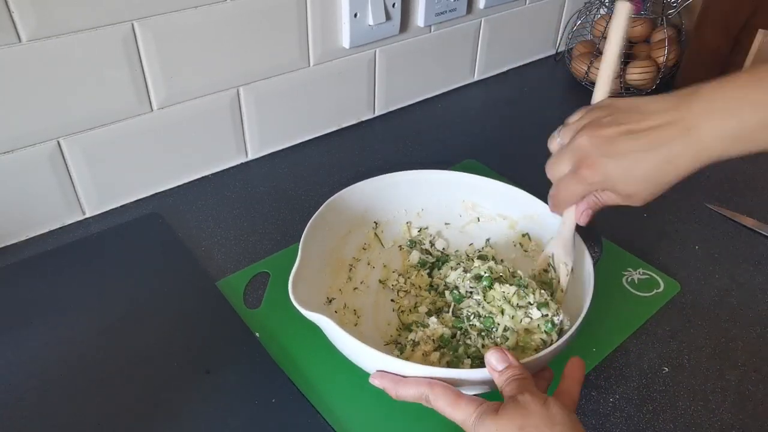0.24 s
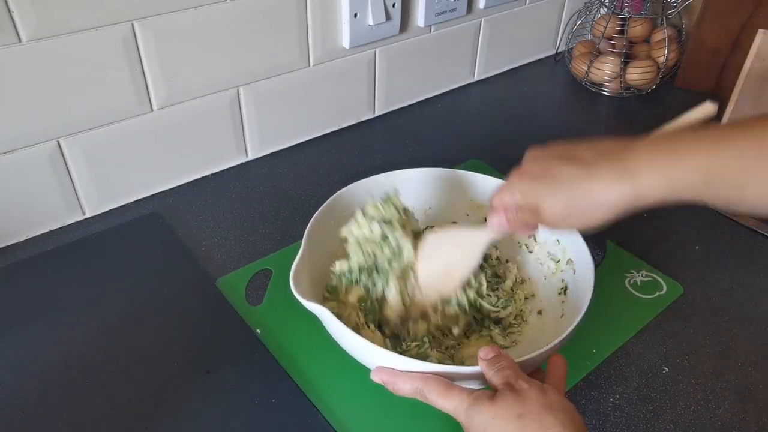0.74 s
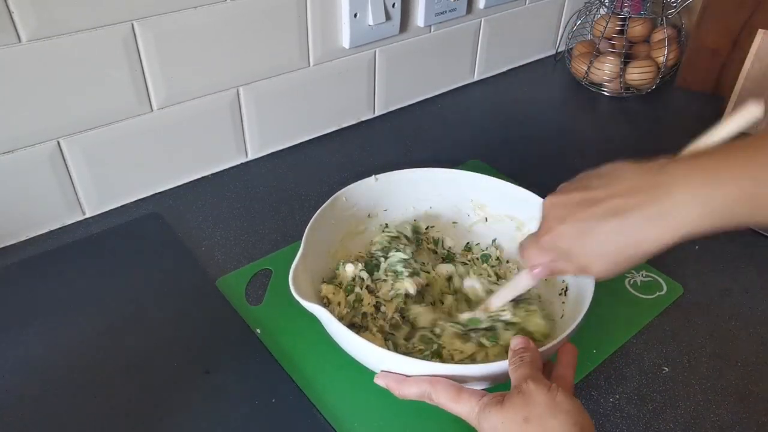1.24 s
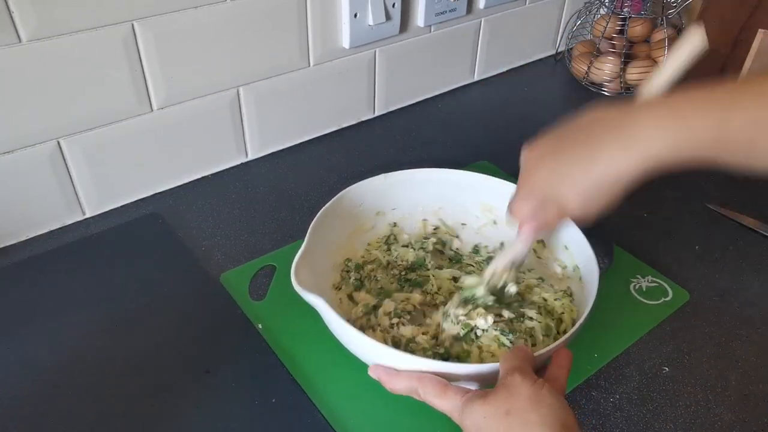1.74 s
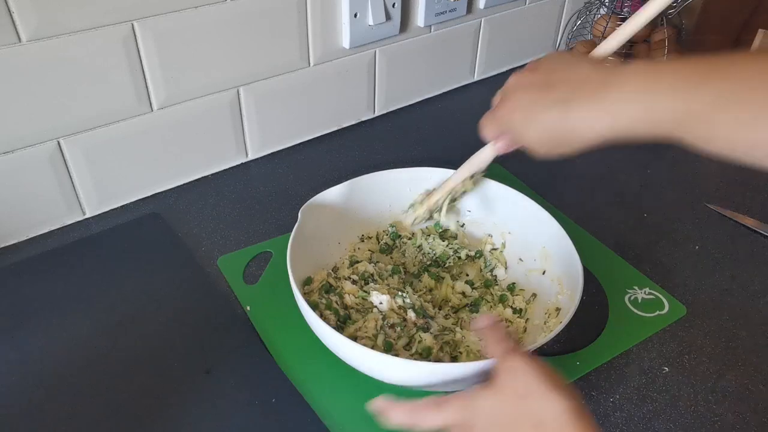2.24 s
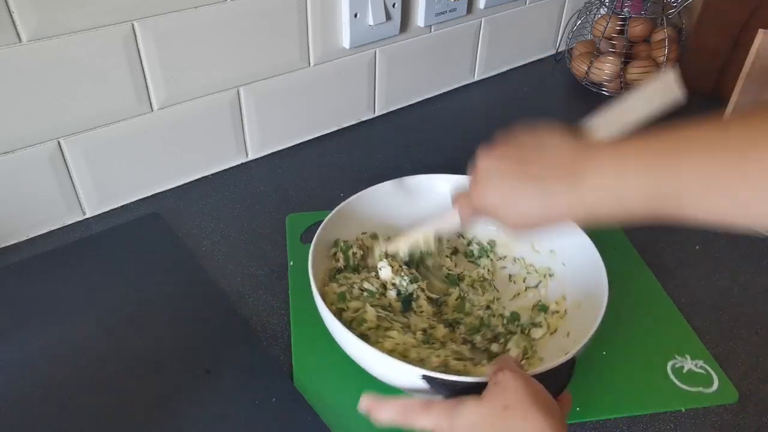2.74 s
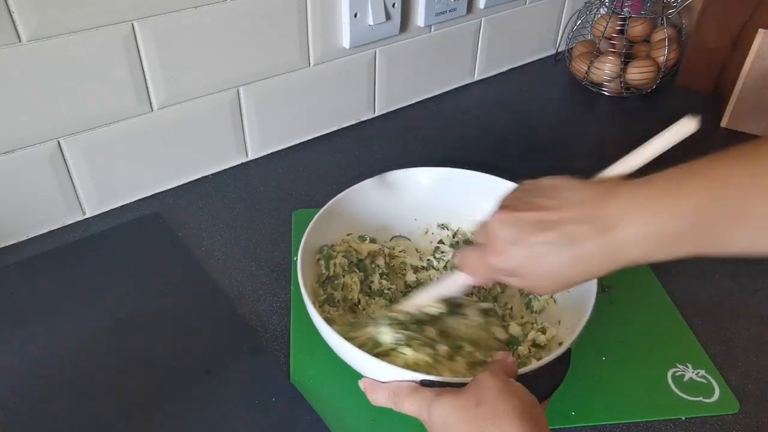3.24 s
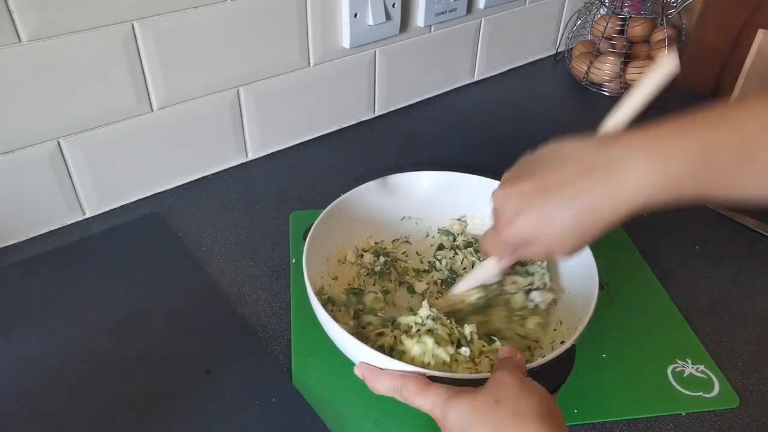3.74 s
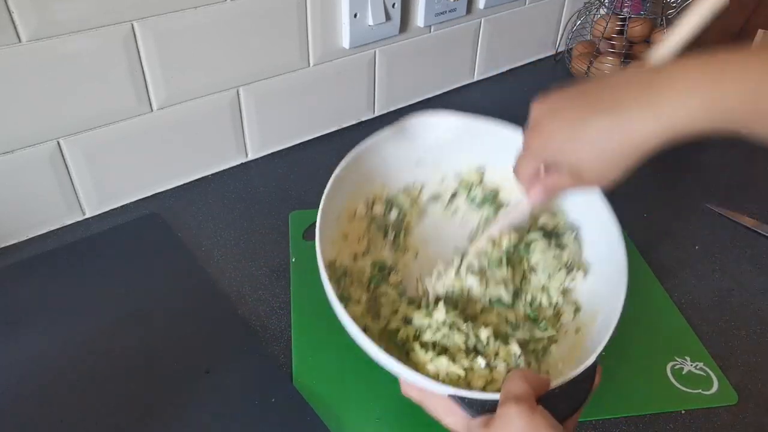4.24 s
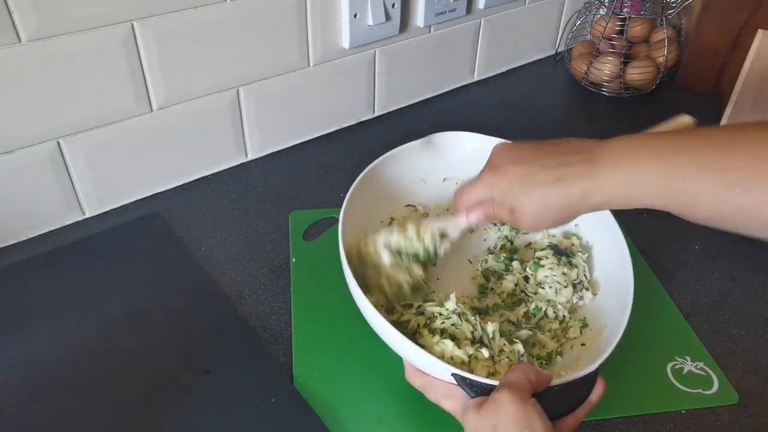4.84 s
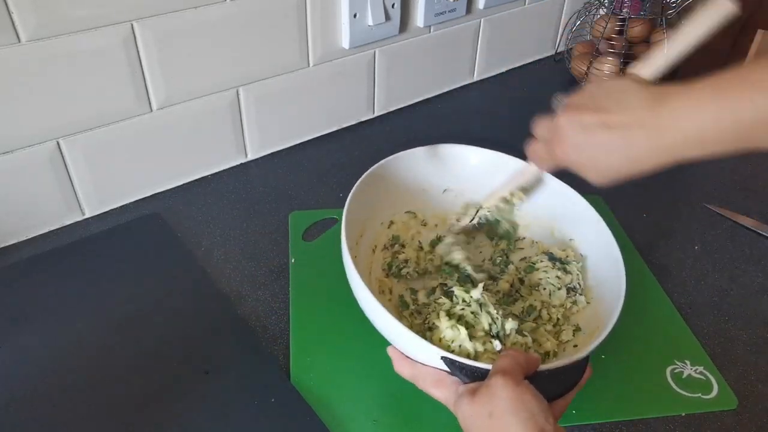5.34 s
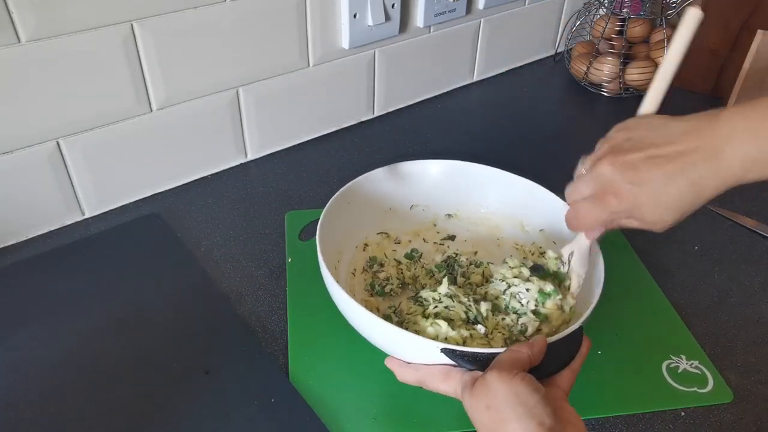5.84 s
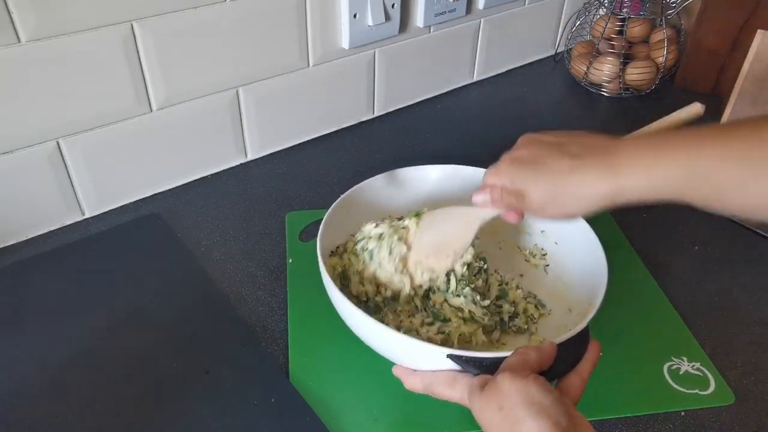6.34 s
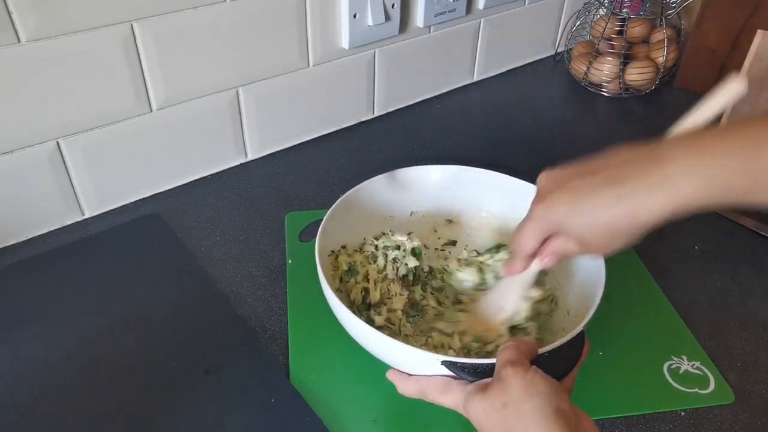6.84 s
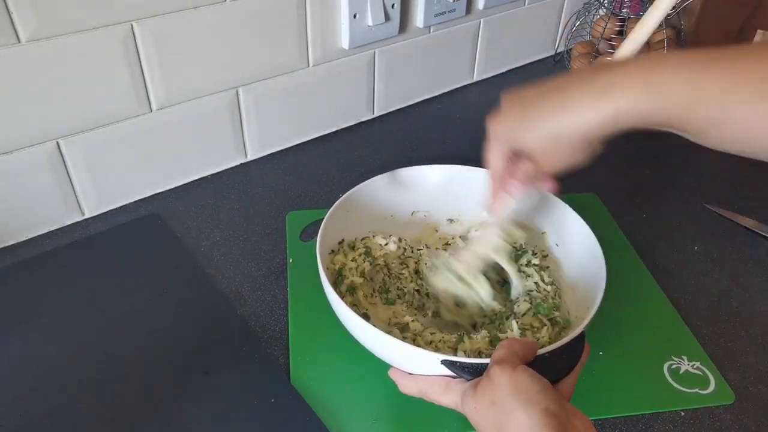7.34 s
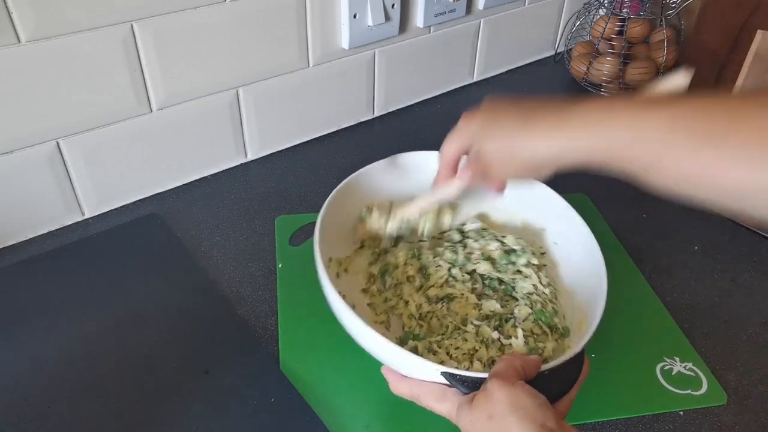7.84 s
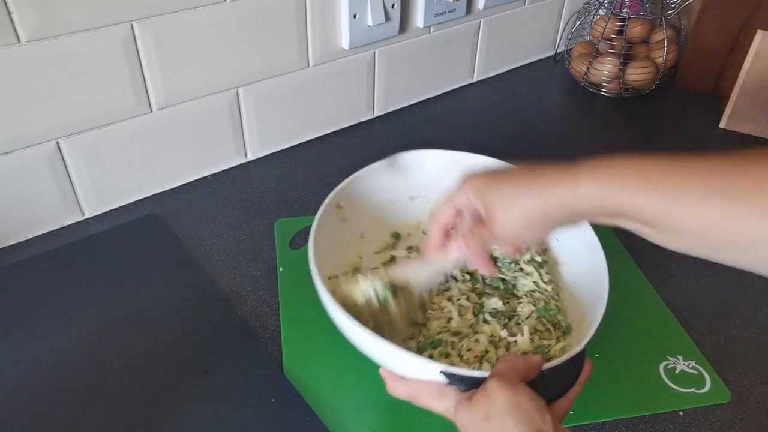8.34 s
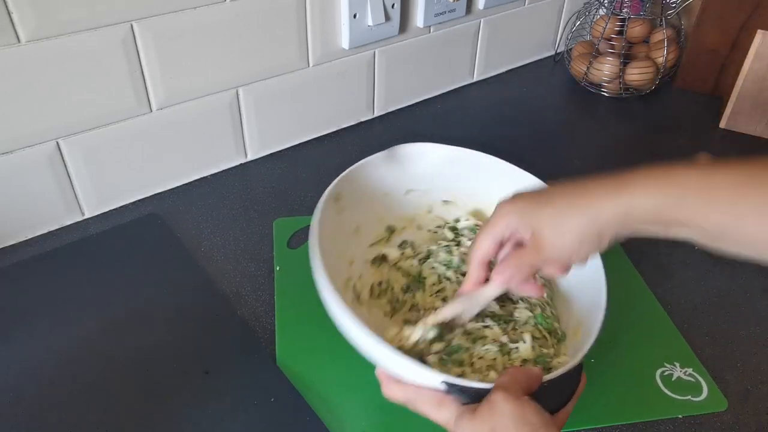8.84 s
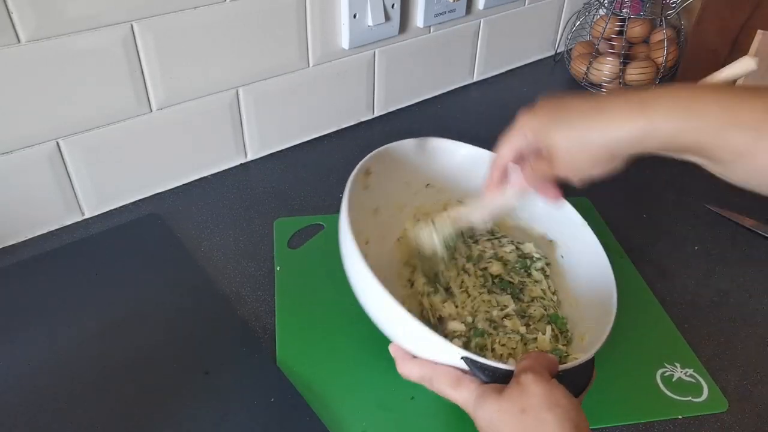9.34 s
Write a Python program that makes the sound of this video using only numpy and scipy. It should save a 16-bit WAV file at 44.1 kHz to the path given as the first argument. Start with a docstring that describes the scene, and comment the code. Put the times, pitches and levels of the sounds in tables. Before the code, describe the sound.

A wooden spoon works thick, wet shredded batter in a plastic bowl, heard closely in stereo and slightly right of centre. From 0 to 2 seconds, soft strokes swell and fade: fine sticky crackling, scraping and a hollow drag, with barely audible knocks. At 2.15 a short woody squeak meets a firm double knock; a moist pop follows near 2.4 and another at 2.9. Hollow knocks land around 3.4, 3.7, 4.1 and 4.6. Near 4.8 there is a wet smack, then a low bump as the bowl settles around 4.9. A knock at 5.4 leads into the strongest squelch at 5.6. Between 6 and 8 the stirring is mainly wet, with pops and lighter taps. Sharper knocks come at 8.3 and 8.8, the loudest at 9.1, then a softer one at 9.5. Short kitchen echoes and faint low hum remain throughout.

```python
"""A wooden spoon folds thick grated-vegetable batter in a hand-held plastic bowl on a kitchen worktop.
Each push tears tiny wet films (showers of clicks) and rubs the bowl (slips filtered into scrape and drag).
Damp wood squeaks in pitched noise, knocks flex the wall as damped swings, wet pockets pop as noise bursts,
and the bowl bumps on its board in fading low tones.
Bowl and room add short echoes, over a low appliance hum and faint room noise."""
import sys
import numpy as np
from scipy import signal
from scipy.fft import rfft, irfft
from scipy.io import wavfile
from scipy.ndimage import uniform_filter1d

SR = 44100
rng = np.random.default_rng(int(sys.argv[2]) if len(sys.argv) > 2 else 0)


def transcribe(u):
    """Save the signal u as a 16-bit wav file named by the first command-line argument.

    u: samples, shape (n,) or (channels, n), limited to [-1, 1]; the rate is SR.
    q: integer samples, one column per channel.
    """
    v = np.clip(np.atleast_2d(u).T, -1, 1)
    q = np.round(v * 32767).astype(np.int16)
    wavfile.write(sys.argv[1], SR, q)


N = 422478  # length in samples

# Pushes of the spoon through batter: start t/s, attack t/s, hold t/s, release t60/s,
# squelch level/dB before a fixed boost, scrape and drag level/dB compared with that squelch level
PUSHES = [(-.08, 0.13, 0.045, 0.75, -53.5, -1, -3), (0.339, 0.24, 0.017, 0.67, -59.5, 1.5, 2),
          (.64, 0.04, 0.23, 1.1, -62, -5, -10), (1.101, 0.18, 0.037, 0.48, -55, -3.5, -8.5),
          (1.353, 0.044, 0.0086, 0.11, -53, -10, -25), (1.583, 0.093, 0.18, 0.3, -53.5, -8, -12),
          (1.93, 0.11, 0.077, .3, -70, 4.5, 7.5), (2.081, 0.054, 0.0089, 0.43, -50.5, -0.5, 6),
          (2.383, 0.029, 0.19, .4, -51.5, -6.5, -9.5), (2.437, 0.1, 0.099, 0.94, -51.5, 0.5, 3),
          (2.79, .02, 0.072, 0.64, -56, -3, -2.5), (2.864, 0.013, 0.071, 0.68, -50.5, -7, -7),
          (3.193, 0.18, .06, 0.51, -50, -5.5, -11), (3.637, 0.086, 0.093, 0.5, -52.5, -4.5, -2.5),
          (4.097, 0.016, 0.025, 0.92, -53.5, -4, -2), (4.665, 0.083, 0.18, 1.33, -55.5, -4.5, -3.5),
          (5.05, 0.057, 0.086, 0.16, -57, -8, -11.5), (5.359, 0.081, 0.16, 0.27, -54, -10, -9),
          (5.516, 0.12, 0.016, 0.54, -46.5, 1, 0), (5.887, 0.058, 0.17, 0.46, -65, -5, -7),
          (6.046, 0.12, 0.046, 0.63, -54.5, -.5, -5.5), (6.294, 0.021, 0.17, 0.75, -64, -14, -23),
          (6.726, 0.11, 0.14, 0.58, -50.5, -5, -13.5), (7.132, 0.082, 0.15, 0.28, -51, -6.5, -12.5),
          (7.539, 0.078, 0.11, 0.34, -51, -4, -7), (7.908, 0.094, 0.016, 0.61, -50, -3, 0.5),
          (8.122, 0.0081, 0.035, 0.18, -53, -4, -25), (8.309, 0.01, 0.16, 0.53, -56.5, -4, -0.5),
          (8.553, .06, .015, 0.093, -61.5, -3, -3), (8.758, 0.062, 0.042, 0.54, -55, -3, -0.5),
          (9.14, 0.022, 0.12, 0.54, -58.5, -2, -6), (9.302, 0.059, 0.008, 0.12, -53, -7.5, -17),
          (9.495, 0.018, 0.056, .5, -59, -5, -2)]
# Share of fine high fizz in the squelch: t/s, level/dB above 8 kHz
FIZZ_SHARE = [(1.7, -1), (2.2, -7.5), (2.5, -5), (3.3, -0.5), (4.3, -1), (5.1, 3), (5.7, -3.5), (7.3, 0),
              (8.8, 3.5), (9.5, 1)]
# Spectrum shape of wet films: f/Hz, relative level/dB
WET_SPECTRUM = [(1470, -18.5), (2500, -9), (3740, -6.5), (5870, -1.5), (6760, -2.5), (8020, -12.5),
                (9960, -8), (10800, -5.5), (11800, -8.5), (13000, -3.5), (14100, -11.5), (15200, -6),
                (16000, -25)]
# Spectrum shape of scraping on the wall: f/Hz, relative level/dB
SCRAPE_SPECTRUM = [(300, -19.5), (800, -19), (1300, -1), (1700, 2), (2300, 1.5), (2900, -2), (4000, -13.5),
                   (8000, -29)]
# Spectrum shape of the hollow drag: f/Hz, relative level/dB
DRAG_SPECTRUM = [(80, -0.5), (200, -9), (350, -3.5), (600, 4), (800, -1.5), (1100, -2.5), (1500, -15.5),
                 (3000, -53)]
# Left minus right for the batter: f/Hz, level/dB
BATTER_LEAN = [(100, 1.5), (500, -9), (1200, -3.5), (2500, -3.5), (5000, -5), (7000, 0.5), (9000, -4),
               (11500, -15.5), (16000, -40)]
# Appliance hum: f/Hz, level/dB (rms, before wavering)
HUM_TONES = [(47.2, -82.5), (49.8, -58), (98.8, -65)]
# Spectrum shape of the room noise: f/Hz, relative level/dB
ROOM_SPECTRUM = [(20, -22.5), (32, -5.5), (46, -2), (60, -2), (78, -34), (105, -13.5), (160, -23.5),
                 (300, -23.5), (800, -32.5), (2000, -39.5), (3500, -41.5), (5500, -38.5), (8500, -50),
                 (16000, -51)]
# Filter for the left-right difference of the room noise: f/Hz, level/dB
ROOM_WIDTH = [(150, -11.5), (600, -1.5), (2000, -0.5)]
# Damp wood squeaking on the wall: middle t/s, length t/s, pitch f/Hz, relative level/dB
WOOD_SQUEAKS = [(0.05, 0.12, 694, -66), (0.064, 0.071, 2170, -68.5), (0.486, 0.24, 2210, -64.5),
                (0.926, 0.064, 1030, -67.5), (1.076, 0.19, 2980, -70), (1.092, 0.093, 860, -67),
                (2.15, 0.032, 2150, -49.5), (4.865, 0.059, 1790, -55.5), (6.2, 0.23, 780, -62.5),
                (6.875, .06, 960, -61)]
# Spoon against bowl: t/s, knock level/dB, knock f/Hz, overtone relative level/dB,
# crack f/Hz, crack relative level/dB, board thud relative level/dB (overtone and thud get fixed boosts)
SPOON_KNOCKS = [(0.220, -47.5, 300, -2, 1500, -1.5, 8), (0.838, -55.5, 420, -44, 1850, -36, -20),
                (2.024, -51, 218, -17, 2000, -27, 15), (2.154, -27, 370, -1.5, 1610, -4.5, -0.5),
                (2.161, -21, 252, -19, 1080, -18, -9), (3.182, -60.5, 398, 10.5, 1700, -19, -20),
                (3.378, -23.5, 311, -10, 1680, -19, -6), (3.680, -30, 277, -36, 1788, -23, -6.5),
                (3.751, -38, 458, -23, 1700, 4, -4.5), (4.116, -22, 306, -5, 1710, -15, -10),
                (4.634, -18, 456, -6.5, 1970, -7.5, -44), (4.756, -41, 428, -3, 2000, -25, -26),
                (4.806, -51, 477, 9, 1200, -14, -24), (5.341, -55.5, 430, 2, 1840, 4, -20),
                (5.387, -20.5, 356, -1.5, 2640, -7.5, -29), (5.724, -32.5, 332, -19, 1940, 0, 3),
                (5.880, -53, 308, -24, 1900, -9.5, -3), (6.472, -46.5, 277, -17, 1920, -3, 0),
                (7.13, -38, 318, -10, 1600, -23, -3), (7.896, -46.5, 410, -8, 1900, -8, -16),
                (7.920, -44.5, 324, -14, 1700, -14, -4), (7.996, -38, 312, -22, 1750, -10, -18),
                (8.013, -40, 380, 8, 1220, 7, 2), (8.324, -24.5, 490, 1, 1700, 8.5, -16),
                (8.331, -35, 490, 11, 2130, 6, -25), (8.756, -19.5, 323, -7, 2690, -8.5, -22.5),
                (9.139, -11.5, 421, -6.5, 2700, -15.5, -39), (9.503, -26.5, 286, -51, 2030, -21.5, -13.5)]
# Ringing tones of the bowl wall, damped by batter and hand: f/Hz, relative level/dB, t60/s
BOWL_MODES = [(319, -5, 0.23), (396, -10, 0.235), (483, 4, 0.063), (592, -7, 0.091), (707, -3, 0.17),
              (801, 13, 0.078), (934, -10, 0.066), (940, -10, .18), (1230, -15, 0.12), (1200, 14, 0.039),
              (1520, -10, .1), (1672, -5, .12), (1810, 9, 0.082), (2120, 1, .1), (2335, 13.5, .07),
              (2860, -11, .07)]
# Spectrum shape of the contact tick: f/Hz, relative level/dB
TICK_SPECTRUM = [(300, 1), (1000, 10.5), (1800, 2), (2700, 1), (3600, -9), (6500, -7), (8500, -22.5),
                 (13000, -15), (16000, -19)]
# Wet pockets popping: t/s, relative level/dB, extra level/dB above 8 kHz
WET_SMACKS = [(0.836, -53.5, 25), (1.746, -38, 2), (2.404, -38, 13), (2.434, -13.5, -18),
              (2.801, -38.5, 15), (2.88, -18.5, -16), (3.035, -38.5, 20), (3.663, -33, 3),
              (3.7494, -35, 13), (3.94, -46, 23), (4.253, -28.5, 4.5), (4.403, -39.5, 13.5),
              (4.777, -19, 5), (4.909, -36, 19), (6.136, -16.5, -1), (6.8668, -24, 0), (7.931, -20.5, 9),
              (8.155, -28.5, 12), (8.756, -26.5, 14.5), (9.504, -33.5, 16.5)]
# Bowl settling on the board: t/s, level/dB, pitch f/Hz
BOWL_BUMPS = [(2.171, -40, 65), (4.859, -33, 149), (4.866, -33.5, 120.6), (4.875, -30, 52),
              (4.968, -42, 52), (7.561, -47.5, 187)]
# How long the kitchen rings: f/Hz, t60/s
KITCHEN_DECAY = [(80, 0.46), (300, 0.22), (800, 0.3), (2500, 0.32), (7000, 0.23), (15000, 0.14)]
# Left minus right for the bowl: f/Hz, level/dB
BOWL_LEAN = [(120, 0.5), (280, -2), (550, -4.5), (1100, -5), (2500, -5.0), (6000, -10.5), (12000, -41.0)]

TOP_HZ = 16100  # upper edge of the final sound
SAG_DB_PER_S = 4.5  # the batter gives way while the push is held
WALL_POWER = 1.34  # rubbing on the wall follows the push to this power
BUMP_CYCLES = 13.2  # swings until a bump's decay reaches -60 dB
OVERTONE_RATIO = 1.89  # second flexing of the wall, as a multiple of the knock pitch


def undb(db):
    """Turn decibels into gain."""
    return 10 ** (np.asarray(db) / 20)


def unit(x):
    """Scale to rms 1."""
    return x / np.sqrt(np.mean(x ** 2))


def at(points, hz):
    """Read (Hz, value) points on a log-frequency axis."""
    f, value = np.transpose(points)
    return np.interp(np.log(np.maximum(hz, 1)), np.log(f), value)


def colour(x, points):
    """Filter by (Hz, dB) points without sounding early; the cepstrum gives the minimum-phase response."""
    size = 4096
    gain = undb(at(points, np.linspace(0, SR / 2, size // 2 + 1)))
    cepstrum = irfft(np.log(gain))
    # fold the second half onto the first
    cepstrum[1:size // 2] *= 2
    cepstrum[size // 2 + 1:] = 0
    response = irfft(np.exp(rfft(cepstrum)))
    return signal.fftconvolve(x, response)[:len(x)]


def sine(hz, t):
    """A pure tone of peak 1."""
    return np.sin(2 * np.pi * hz * t)


def split_filter(kind):
    """Filter that keeps the sound below ("low") or above ("high") 8 kHz."""
    return signal.butter(3, 8000, kind, fs=SR, output="sos")


def add(track, s, x):
    """Mix x into track at time s, or at the very start if s is negative."""
    i = max(int(s * SR), 0)
    n = min(len(x), len(track) - i)
    track[i:i + n] += x[:n]


def walk(rate):
    """Random levels, rate of them per second, joined by straight glides; rms 1."""
    k = max(int(SR / rate), 1)
    steps = np.repeat(rng.standard_normal(N // k + 1), k)[:N]
    return unit(uniform_filter1d(steps, k))


def fade(t, t60):
    """Exponential decay, 60 dB down at t60."""
    return undb(-60 * t / t60)


def curves(table):
    """Columns of a (s, ..) table, joined by straight lines."""
    s, *columns = np.transpose(table)
    return [np.interp(np.arange(N) / SR, s, c) for c in columns]


def grains(per_s, spread_db):
    """Randomly timed clicks, more uneven in size as spread_db grows; rms 1."""
    sizes = undb(spread_db * np.minimum(rng.exponential(size=N), 5))
    happens = rng.random(N) < per_s / SR
    return unit(happens * sizes * rng.choice([-1, 1], N))


def scatter(clicks, near_db, far_db):
    """Clicks from many spots leave noise-like echoes: quick ones in the bowl, slow ones in the room."""
    t = np.arange(SR // 3) / SR
    near, far = fade(t, 0.014) ** 2, fade(t, 0.19) ** 2
    echo = undb(near_db) ** 2 * near / near.sum() + undb(far_db) ** 2 * far / far.sum()
    energy = np.maximum(signal.fftconvolve(clicks ** 2, echo)[:N], 0)
    echoes = np.sqrt(energy) * rng.standard_normal((2, N))
    return (clicks + echoes) / np.sqrt(1 + echo.sum())


def voiced(x, points):
    """Give a white stereo pair a spectrum while keeping its power about the same."""
    gain = np.sqrt(np.mean(undb(at(points, np.linspace(0, SR / 2, 2048))) ** 2))
    return np.array([colour(side, points) for side in x]) / gain


def brighten(x, db):
    """Change the level above 8 kHz, where the thinnest films sound."""
    top = signal.sosfiltfilt(split_filter("high"), x)
    return x + (undb(db) - 1) * top


def pockets(x, depth_db):
    """Hollows between spoon, batter and wall open and close, so narrow resonances come and go."""
    _, _, spectra = signal.stft(x, nperseg=1024)
    field = rng.standard_normal(spectra.shape[1:])
    # smooth the random gains over pitch, then over time
    for _ in range(2):
        field = uniform_filter1d(field, size=4, axis=0)
        field = uniform_filter1d(field, size=2, axis=1)
    gain = unit(undb(depth_db * unit(field)))
    return signal.istft(spectra * gain, nperseg=1024)[1][:, :N]


def pushes():
    """Each push builds, holds as the batter yields, then dies away; gives gains of squelch, scrape and drag."""
    power = np.zeros((3, N))
    for s, attack, hold, t60, db, scrape_db, drag_db in PUSHES:
        t = np.maximum(np.arange(N) / SR - s, 0)
        push = np.minimum(t / attack, 1)
        push = push * undb(-SAG_DB_PER_S * np.clip(t - attack, 0, hold))
        push *= fade(np.clip(t - attack - hold, 0, 2 * t60), t60)
        wall = push ** WALL_POWER
        gains = np.array([push, undb(scrape_db) * wall, undb(drag_db) * wall])
        power += (undb(db) * gains) ** 2
    return np.sqrt(power)


def squelch(strength, fizz_db):
    """Wet films tear between the shreds: a fine, uneven fizz with coarser crackles on top."""
    fizz = grains(per_s=6300, spread_db=0.0) * undb(1.84 * walk(70))
    crackle = grains(per_s=200, spread_db=4.0)
    tears = unit(fizz + undb(-3.5) * crackle) * undb(4) * strength
    wet = voiced(scatter(tears, near_db=7.0, far_db=8.5), WET_SPECTRUM)
    return pockets(brighten(wet, fizz_db), depth_db=2.5)


def rubbing(scraping, dragging):
    """Shreds slip over the wall in small jerks, heard as a scrape and a hollow drag of the whole bowl."""
    slips = unit(grains(per_s=1200, spread_db=2.5) * undb(2.1 * walk(45)))
    scrape = scatter(slips * undb(1) * scraping, near_db=-7.0, far_db=2.5)
    drag = scatter(slips * dragging, near_db=-9.0, far_db=-0.5)
    both = voiced(scrape, SCRAPE_SPECTRUM) + voiced(drag, DRAG_SPECTRUM)
    return pockets(both, depth_db=1.5)


def background():
    """A wavering appliance hum of pure tones and faint room noise, its bass mostly shared by both sides."""
    t = np.arange(N) / SR
    hum = np.zeros(N)
    for hz, db in HUM_TONES:
        level = undb(db + 0.5 * walk(2.6)) * np.sqrt(2)  # root 2 turns rms into peak
        hum += level * np.sin(2 * np.pi * hz * t + 0.08 * walk(16))
    mid, side = (unit(colour(rng.standard_normal(N), ROOM_SPECTRUM)) for _ in range(2))
    side = colour(side, ROOM_WIDTH)
    return hum + undb(-61) * (mid + side * np.array([[1], [-1]]))


def squeaks():
    """Wood that quickly sticks and slips gives short, rough, pitched rubs: noise through a ringing tone."""
    out, t = np.zeros(N), np.arange(SR // 20) / SR
    for s, length, hz, db in WOOD_SQUEAKS:
        n = int(length * SR)
        ring = sine(hz, t) * fade(t, 0.007)
        rub = signal.fftconvolve(rng.standard_normal(SR // 2), ring)[:n]
        add(out, s - length / 2, undb(db) * unit(rub) * np.hanning(n))
    return out


def flex(cycles):
    """The damped wall gives way and springs back for a cycle or two; peak 1."""
    swing = -np.sin(2 * np.pi * cycles) * cycles ** 1.78 * np.exp(-cycles / 0.32)
    return swing / np.abs(swing).max()


def knocks():
    """Each blow flexes the wall, rings its modes and thuds through the board; bare wood adds a crack."""
    out, t = np.zeros(N), np.arange(SR // 3) / SR
    modes = sum(undb(db) * sine(hz, t) * fade(t, t60) for hz, db, t60 in BOWL_MODES)
    thud = sine(117, t) * fade(t, 0.058) * (1 - fade(t, 0.017))
    for s, db, hz, overtone_db, crack_hz, crack_db, thud_db in SPOON_KNOCKS:
        bend = flex(hz * t)
        overtone = sine(OVERTONE_RATIO * hz, t) * fade(t, 0.012) * (1 - fade(t, 0.0049)) ** 2
        burst = rng.standard_normal(len(t)) * fade(t, 0.019) * (1 - fade(t, 0.027))
        tick = colour(burst, TICK_SPECTRUM)
        wood = sine(crack_hz, t) * fade(t, 0.006) * (1 - fade(t, 0.004))
        crack = undb(1) * tick / np.abs(tick).max() + undb(7.5) * wood
        blow = bend + undb(overtone_db + 10.5) * overtone + undb(crack_db) * crack
        ring = undb(-57.5) * signal.fftconvolve(blow, modes)[:len(t)]
        add(out, s, undb(db) * (blow + ring + undb(thud_db + 5.0) * thud))
        # a bowl pressed onto the board chatters twice as it rocks
        chatter = undb(db + min(thud_db - 7, -5)) * bend
        add(out, s + 0.00871, chatter)
        add(out, s + 0.01833, undb(1.5) * chatter)
    return out


def smacks():
    """Air pockets burst as the batter peels off the spoon: very short noise bursts, each with its own fizz."""
    low, high, t = np.zeros(N), np.zeros(N), np.arange(SR // 20) / SR
    for s, db, fizz_db in WET_SMACKS:
        burst = rng.standard_normal(len(t)) * fade(t, 0.0097) * undb(db - 12.0)
        add(low, s, burst)
        add(high, s, burst * undb(fizz_db))
    low, high = (voiced(scatter(x, near_db=0, far_db=2.5), WET_SPECTRUM) for x in (low, high))
    return signal.sosfilt(split_filter("low"), low) + signal.sosfilt(split_filter("high"), high)


def bumps():
    """The heavy bowl rocks down on the board and the worktop booms briefly, the lower the longer."""
    out, t = np.zeros(N), np.arange(SR // 2) / SR
    for s, db, hz in BOWL_BUMPS:
        boom = sine(hz, t) * fade(t, BUMP_CYCLES / hz) * (1 - fade(t, 0.003))
        add(out, s, undb(db) * boom)
    return out


def kitchen(x, wet_db, build_s):
    """Add the room's many blurred echoes: decaying noise that differs at each microphone."""
    t = np.arange(int(0.6 * SR)) / SR
    hz = np.linspace(0, SR / 2, len(t) // 2 + 1)
    centres = np.geomspace(60, 15360, 9)
    noise = rfft(rng.standard_normal((2, len(t))))
    # long waves reach both microphones alike
    alike = 1 / (1 + (hz / 500) ** 2)
    noise[0] = alike * noise[1] + np.sqrt(1 - alike ** 2) * noise[0]
    tail = np.zeros((2, len(t)))
    for centre in centres:
        # each overlapping band dies away at its own pace
        band = at(np.c_[centres, centres == centre], hz)
        tail += irfft(noise * band, len(t)) * fade(t, at(KITCHEN_DECAY, centre))
    tail = unit(tail * (1 - np.exp(-(t / build_s) ** 2))) / np.sqrt(len(t))
    return x + undb(wet_db) * signal.fftconvolve(x[None], tail, axes=1)[:, :N]


def place(pair, lean):
    """Tilt left against right by frequency, keeping the average of the two gains at 1."""
    hz, db = np.transpose(lean)
    mean_db = 20 * np.log10(1 + undb(db)) - 20 * np.log10(2)
    left = colour(pair[0], np.c_[hz, db - mean_db])
    right = colour(pair[1], np.c_[hz, -mean_db])
    return np.array([left, right])


def scene():
    """Batter and bowl sit mostly a little right of the microphones, over the background."""
    tearing, scraping, dragging = pushes()
    fizz_db, = curves(FIZZ_SHARE)
    batter = squelch(tearing, fizz_db) + rubbing(scraping, dragging) + smacks()
    bowl = undb(3.5) * squeaks() + knocks() + bumps()
    bowl = kitchen(bowl, wet_db=-6.0, build_s=0.0047)
    return place(batter, BATTER_LEAN) + place(bowl, BOWL_LEAN) + background()


def record(dry):
    """A steep low-pass filter removes nearly everything above TOP_HZ."""
    return signal.sosfilt(signal.ellip(10, 0.2, 70, TOP_HZ, fs=SR, output="sos"), dry)


dry = scene()
out = record(dry)
transcribe(out)
```